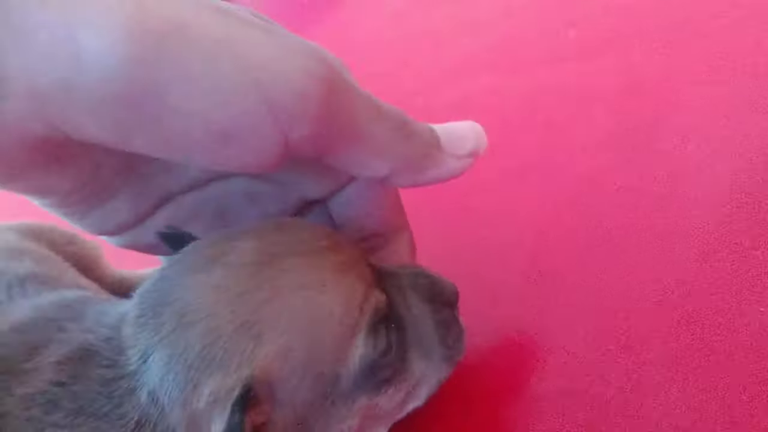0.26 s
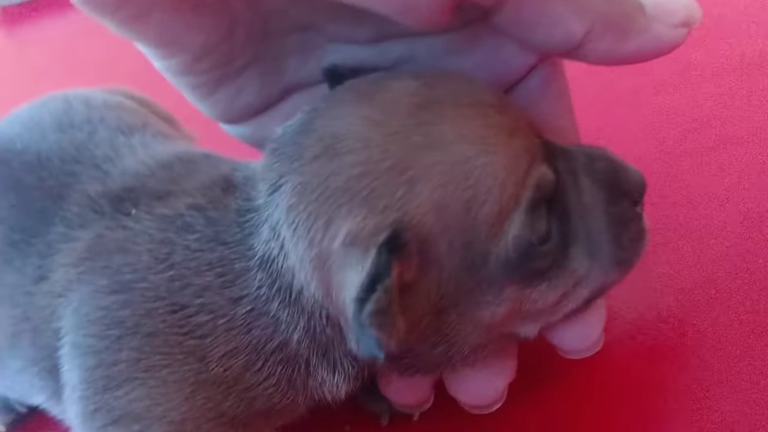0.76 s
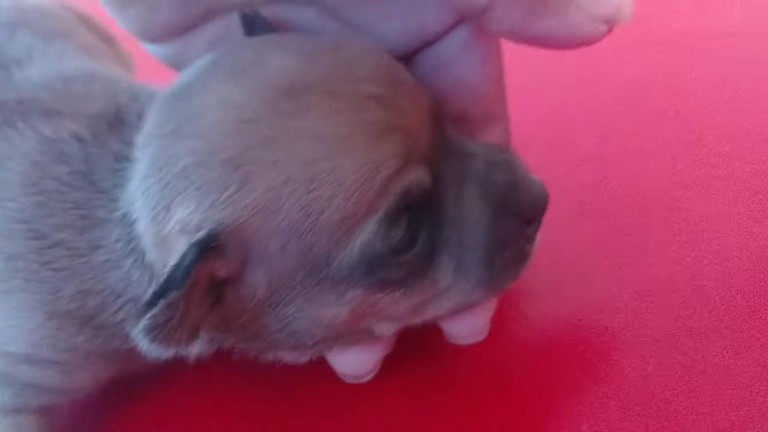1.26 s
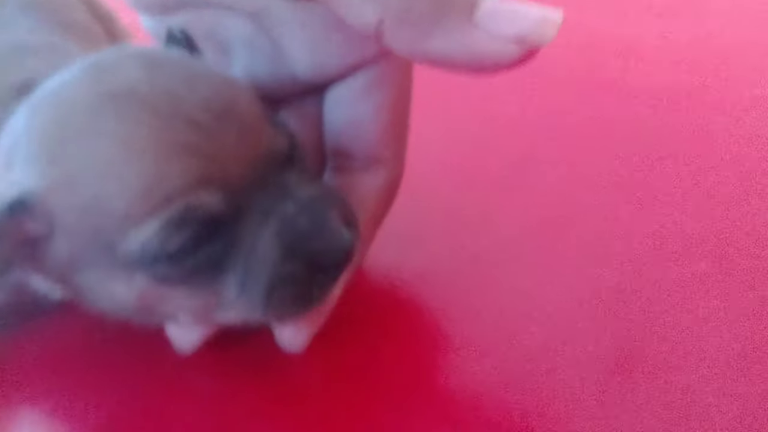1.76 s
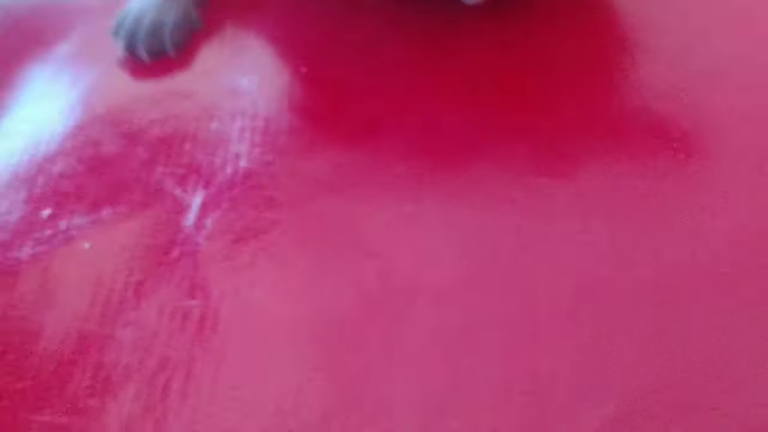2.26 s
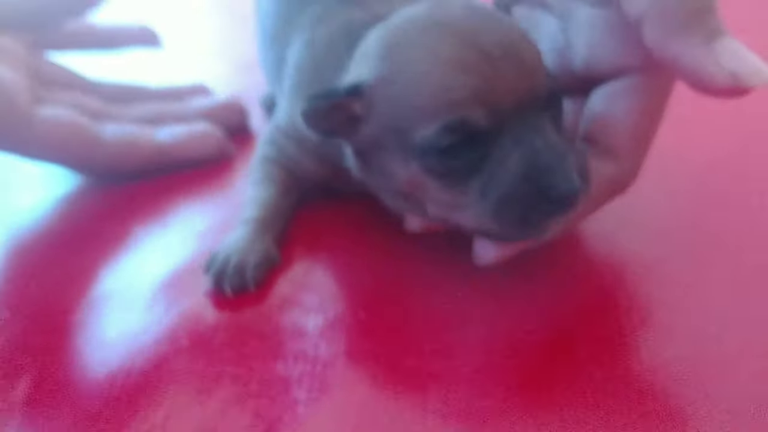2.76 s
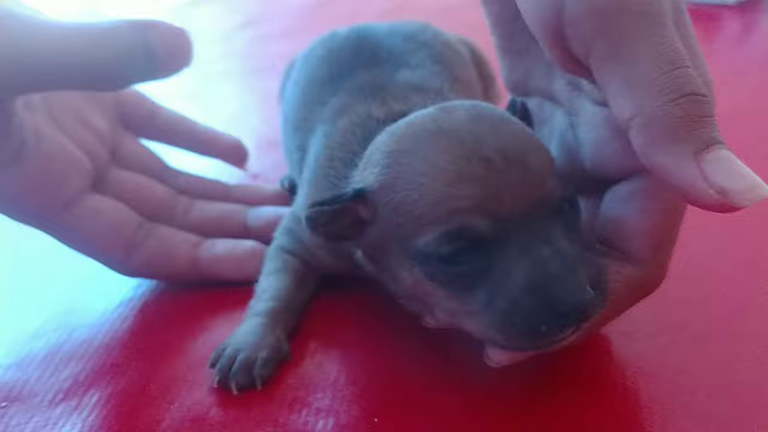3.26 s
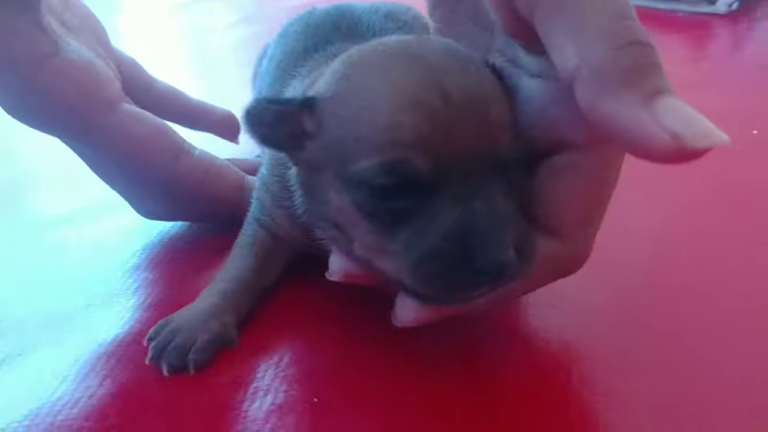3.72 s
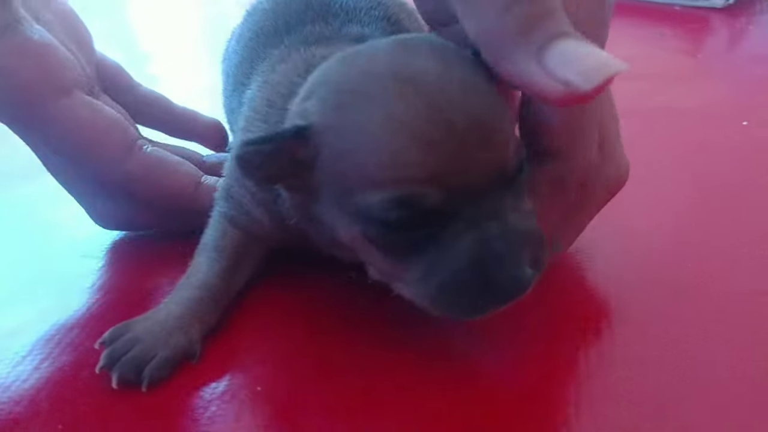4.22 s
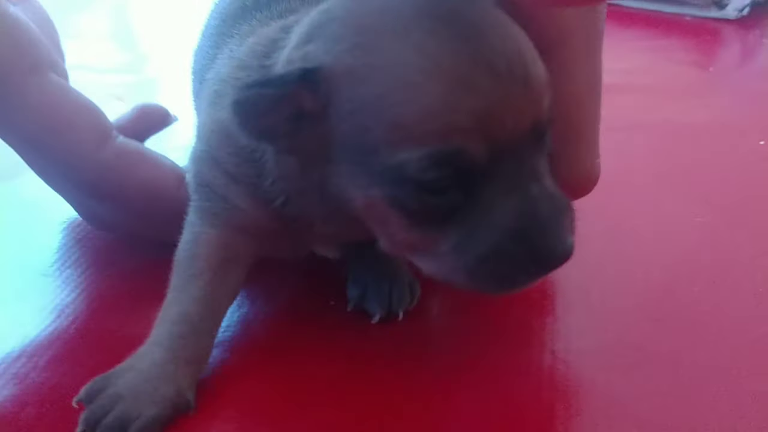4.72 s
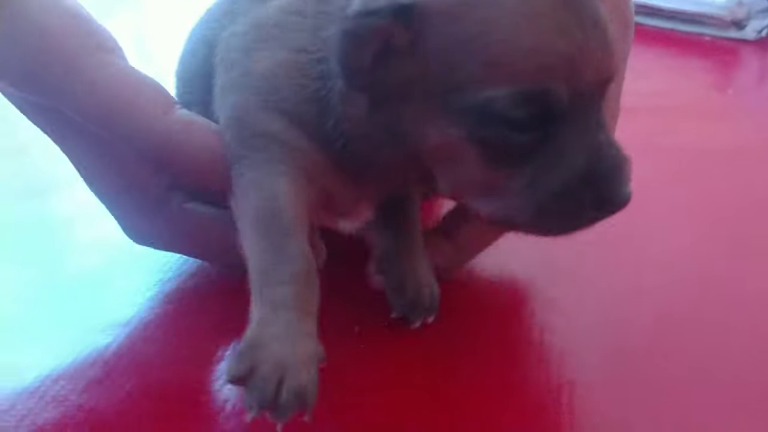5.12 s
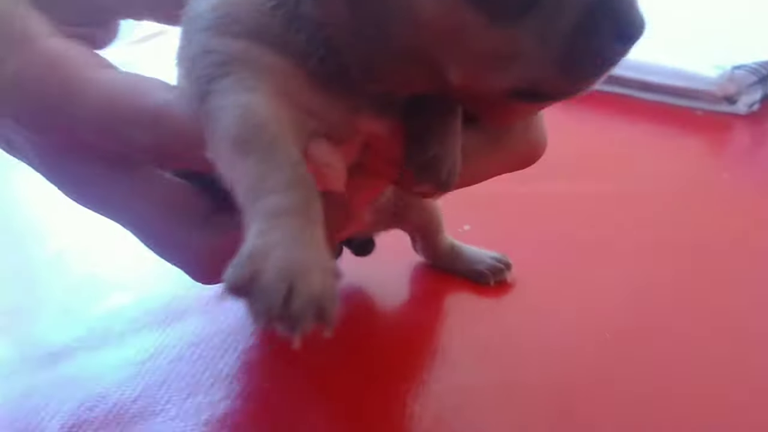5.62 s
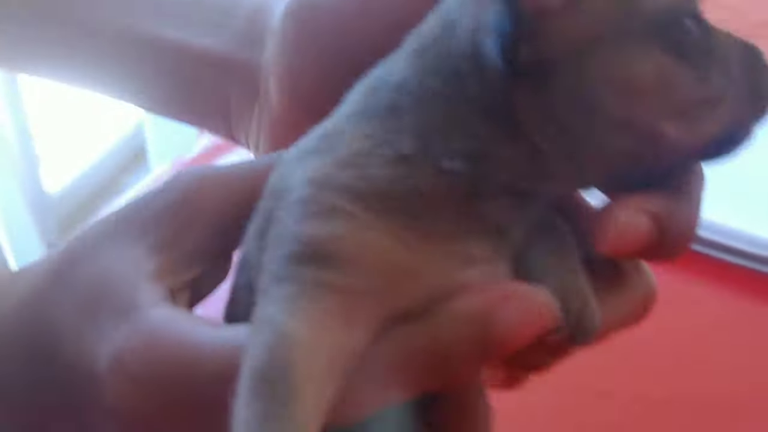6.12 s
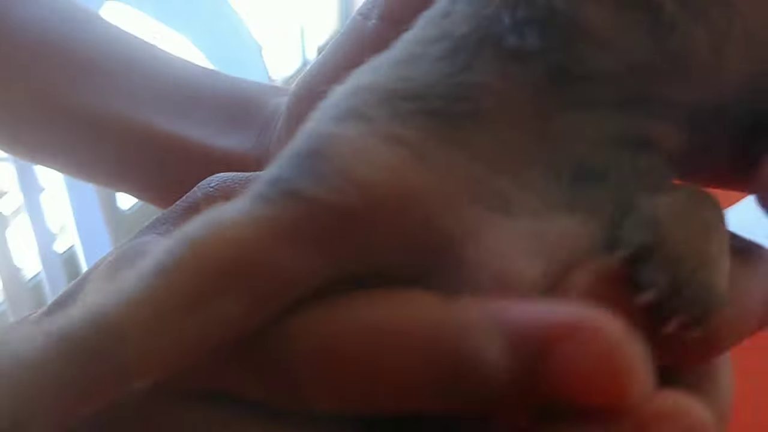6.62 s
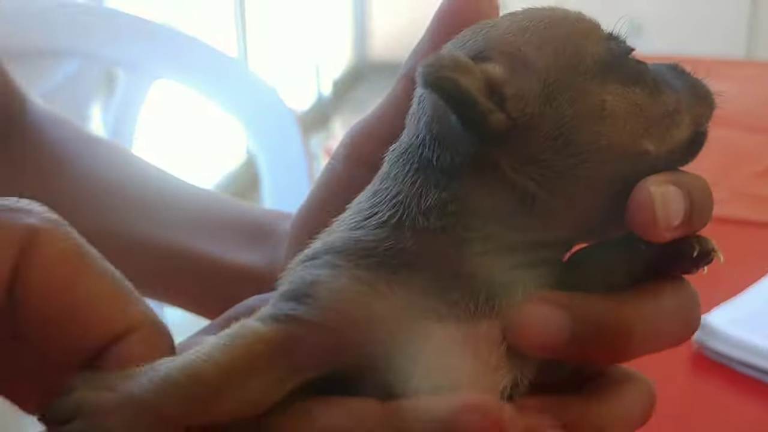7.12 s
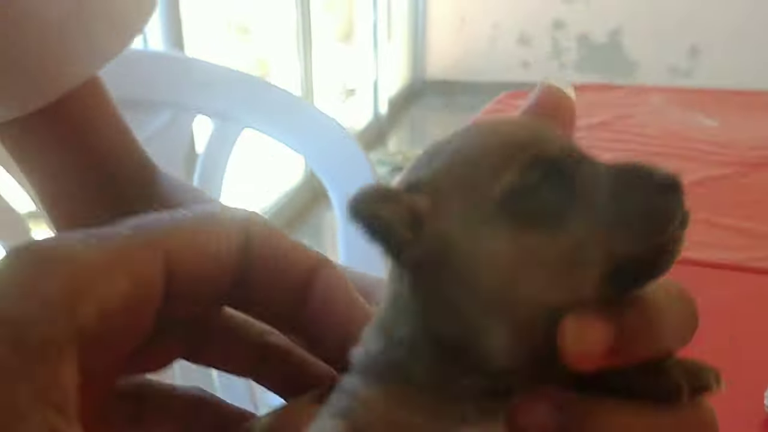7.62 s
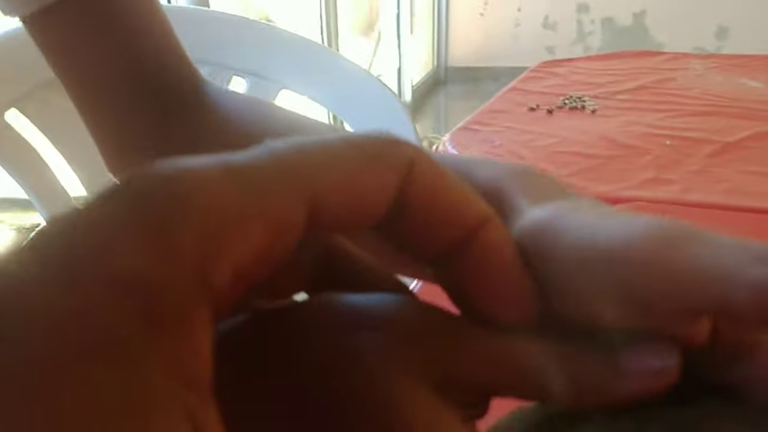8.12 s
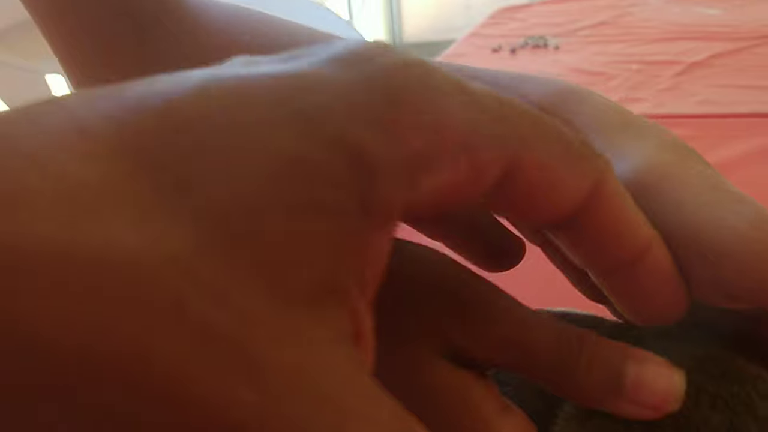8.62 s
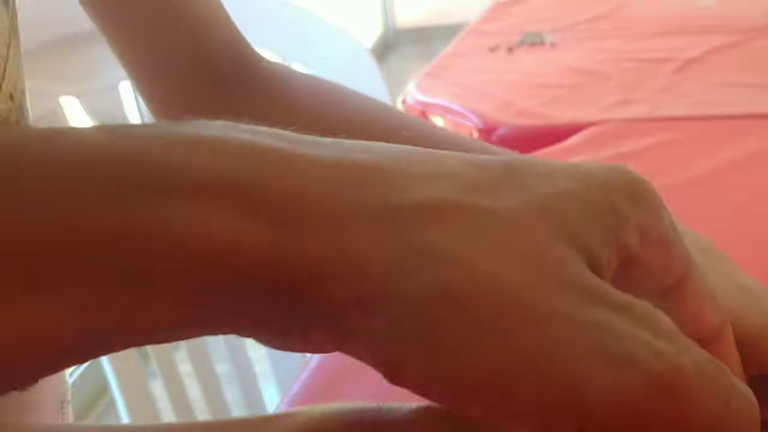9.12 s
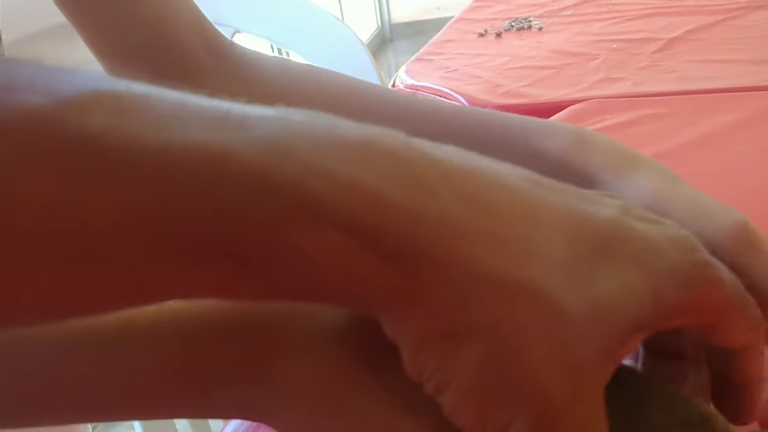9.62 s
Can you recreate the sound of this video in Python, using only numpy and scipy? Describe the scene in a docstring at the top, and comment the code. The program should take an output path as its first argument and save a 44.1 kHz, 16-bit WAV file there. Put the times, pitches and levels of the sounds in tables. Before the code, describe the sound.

A very young puppy cries right beside a small microphone in a nearly dry indoor space. Loud, high wails open, one cracking and fluttering, then lower rising whines. The sound cuts out for a quarter second. Short, soft, arched whimpers follow at about three a second, before louder, longer wails return near the end. A distant machine rumbles and hums faintly underneath.

```python
"""A newborn puppy cries close to a small microphone: short arched whimpers and longer wails that crack and flutter.
Each cry is a stack of overtones coloured by throat and muzzle, with rasp, and air hissing through the nose.
The table top and walls answer faintly; a distant machine rumbles and hums indoors under microphone hiss.
Once the sound drops out for a quarter of a second."""
import sys
import numpy as np
from scipy import signal
from scipy.fft import rfft, irfft, next_fast_len
from scipy.io import wavfile
from scipy.ndimage import uniform_filter1d, map_coordinates

SR = 44100
rng = np.random.default_rng(int(sys.argv[2]) if len(sys.argv) > 2 else 0)


def field_ratio(decibels):
    """Amplitude ratio for a level in dB (20 dB per decade); scalars and array-likes work."""
    return 10 ** (np.asarray(decibels, dtype=float) / 20)


def wav_out(sig):
    """Save sig, one row per channel (or a flat mono array), as 16-bit PCM at SR to the path in sys.argv[1]."""
    wavfile.write(sys.argv[1], SR, np.round(np.clip(np.atleast_2d(sig).T, -1, 1) * 32767).astype(np.int16))


N = 435266

# how well a pitch comes out of the puppy: [f/Hz, level/dB]
CARRY = [(1070, 6), (1200, -1), (1340, -10.5), (1480, -6), (1650, -5.5), (1800, 2.5)]
STALL_DB = -5.5  # the voice thins in a leap between registers


def puppy():
    """The folds give a clean stack of overtones coloured by the throat; rasp and hiss ride along."""
    # wails, yelps and three irregular whimpers, a list of rows for each, before flutter and cracks:
    # [t/s, f/Hz, level/dB]
    cries = [
        [(0.0, 1457, -16.5), (0.032, 1505, -16), (0.056, 1446, -14), (0.21, 1443, -16), (0.224, 1463, -17.5)],
        [(0.387, 1183, -20), (0.399, 1269, -10), (0.406, 1218, -12.5), (0.409, 1128, -11.5), (0.422, 1232, -7),
         (0.428, 1347, -9.5), (0.44, 1508, -14.5), (0.479, 1617, -19.5), (0.489, 1703, -12.5),
         (0.499, 1653, -22), (0.505, 1514, -13), (0.535, 1566, -20.5), (0.563, 1455, -9.5),
         (0.585, 1546, -13.5), (0.765, 1571, -17), (0.89, 1536, -15), (0.901, 1505, -12.5), (0.981, 1466, -18),
         (1.0, 1544, -21), (1.013, 1683, -19)],
        [(1.194, 658.6, -32.5), (1.222, 747, -28.5), (1.238, 844, -19.5), (1.254, 1133, -20.5),
         (1.296, 1249, -22), (1.338, 1205, -29.5), (1.366, 1269, -18), (1.406, 1162, -24), (1.438, 1128, -20.5),
         (1.458, 1006, -19), (1.478, 820, -32.5), (1.492, 755, -33), (1.548, 677, -39)],
        [(1.73, 556.3, -31), (1.744, 556, -26), (1.782, 710, -33.5), (1.814, 840.7, -27.5), (1.858, 972, -17)],
        [(2.118, 1043, -16.5), (2.162, 1117, -32.5)],
        [(2.313, 533.7, -24), (2.327, 550, -20), (2.348, 621.6, -22), (2.375, 755, -22), (2.401, 876, -25),
         (2.421, 1079, -11.5), (2.451, 1105, -14), (2.483, 1135, -20.5), (2.529, 1067, -19), (2.673, 984, -24),
         (2.727, 1006, -26.5)],
        [(2.902, 477, -33.5), (2.92, 486, -33.5), (2.936, 509, -25), (2.994, 653, -32.5), (3.008, 738, -29.5),
         (3.02, 745, -42)],
        [(3.926, 1146, -40), (3.934, 1150, -36.5), (3.946, 1158, -20), (3.949, 1192, -43), (3.953, 1588, -27.5),
         (3.98, 1727, -35.5), (4.118, 1853, -40), (4.152, 1805, -33.5)],
        [(5.071, 1162, -27.5), (5.077, 1174, -26.5), (5.093, 1190, -23.5), (5.101, 1076, -16),
         (5.131, 1179, -18.5), (5.155, 1249, -21.5), (5.161, 1348, -43.5), (5.165, 1514, -29.5),
         (5.195, 1430, -36.5), (5.205, 1025, -19.5), (5.209, 994, -36)],
        [(7.917, 1207, -41), (7.933, 1113, -15.5), (7.945, 1334, -36), (7.948, 1400, -19.5), (7.952, 1840, -32),
         (7.956, 1890, -18.5), (8.001, 1999, -21), (8.067, 1845, -25), (8.099, 1666, -31.5),
         (8.111, 1440, -41.5), (8.119, 976.7, -34)],
        [(8.291, 882.5, -24), (8.311, 868, -26.5), (8.321, 911.5, -16), (8.329, 1077, -14.5),
         (8.349, 1371, -24.5), (8.379, 1454, -19), (8.439, 1514, -25.5), (8.443, 1715, -29), (8.457, 1701, -22),
         (8.467, 1611, -29), (8.505, 1420, -25), (8.511, 1290, -27.5), (8.537, 1308, -26), (8.555, 1217, -27),
         (8.577, 1215, -24), (8.583, 1224, -58), (8.589, 1090, -22.5)],
        [(8.755, 636, -27.5), (8.785, 729, -23), (8.801, 819, -24.5), (8.815, 976, -16.5), (8.827, 1092, -13),
         (8.865, 1170, -22.5), (8.943, 1171, -28.5), (9.0, 1081, -14), (9.043, 1053, -15), (9.07, 923, -17.5),
         (9.125, 967, -21), (9.141, 1064, -19), (9.169, 1115, -29.5)],
        [(9.323, 735, -30.5), (9.347, 739, -28.5), (9.377, 842, -23.5), (9.397, 1020, -16),
         (9.463, 1014, -16.5), (9.523, 1068, -16.5), (9.575, 1156, -19.5), (9.6, 1196, -18.5),
         (9.65, 1289, -21), (9.723, 1345, -23), (9.751, 1434, -23.5)],
    ]
    # one row for each of those: [overtone slope/dB per octave, rasp against voice/dB,
    # rasp gained under strain/dB, hiss level at the start/dB, hiss level at the end/dB];
    # rasp and hiss before the airflow
    cry_voices = [(-11.5, -37, 5.5, -47.5, -56.5), (-13.5, -31.5, 18.5, -53, -43),
                  (-11, -43.5, 33.5, -38.5, -43.5), (-25, -41, 6, -52, -41.5),
                  (-9.5, -29.5, 7.5, -61, -57.5), (-13, -49, 25, -43, -68), (-18, -42, -1, -52, -44.5),
                  (-12, -41, 12, -50, -52.5), (-11.5, -60, 2, -52.5, -58.5), (-13, -41, 29.5, -46.5, -51),
                  (-10.5, -32.5, -2, -35.5, -50), (-11.5, -51.5, 31.5, -42.5, -54),
                  (-13.5, -44, 26.5, -49.5, -55.5)]
    # short arched whimpers: [start t/s, length/s, time in the low register/s, top f/Hz, level/dB]
    whimpers = [(3.203, .118, .055, 1350, -30.5), (3.54, .195, .001, 1635, -32),
                (4.342, .228, .018, 1810, -25.5), (4.737, .167, .012, 1744, -27),
                (5.377, .13, .054, 1462, -22.5), (5.711, .132, .052, 1354, -23),
                (6.053, .115, .004, 1476, -28.5), (6.398, .13, .022, 1379, -28.5),
                (6.753, .13, .03, 1306, -27), (7.103, .212, .007, 1665, -29),
                (7.508, .232, .01, 1822, -27.5)]
    # the same five columns as a cry voice, shared by the arched whimpers above
    whimper_voice = (-14, -65.5, 41, -59.5, -57.5)
    strain_per_s = 5.37  # rise of log pitch at which a voice forced upward is fully strained
    voice, sounding, turns, rasp_db, hiss_db = np.zeros((5, N))
    bend, change_db, flips = cracks()
    calls = list(zip(cries, cry_voices))
    calls += [(whimper(*row), whimper_voice) for row in whimpers]
    for rows, (slope_db, under_db, harsh_db, *air_db) in sorted(calls, key=lambda call: call[0][0][0]):
        (start, first_hz, first_db), (end, last_hz, last_db) = rows[0], rows[-1]
        dying_hz = min(1150, .95 * last_hz)  # the voice sags towards the throat's own note as it dies
        rows = [(start - .006, first_hz, first_db - 35), *rows, (end + 0.013, dying_hz, last_db - 25)]
        s, hz, db = np.transpose(rows)
        span = slice(max(round(s[0] * SR), 0), round(s[-1] * SR))
        t = np.arange(N)[span] / SR
        hz, db = np.interp(t, s, hz), np.interp(t, s, db)
        climb_per_s = uniform_filter1d(np.gradient(np.log(hz), t), size=900)
        strain = np.clip(climb_per_s / strain_per_s, 0, 1)

        hz, db, up = register_flips(t, hz, db)
        strain = np.maximum(strain, up)
        flips[span] = np.maximum(flips[span], 0.42 * up)

        pitch_hz = uniform_filter1d(hz, size=60) * uniform_filter1d(bend[span], size=30)
        pitch_hz = pitch_hz * (1 + .005 * wobble(40, len(t)) + .002 * wobble(400, len(t)))  # quaver and jitter
        phase = 2 * np.pi * np.cumsum(pitch_hz) / SR
        unsteady = np.maximum(flips[span] + (t > end), leaping(hz, t))
        # the bent pitch comes out stronger or weaker
        cracked_db = along(CARRY, hz * bend[span]) - along(CARRY, hz)
        level_db = db + uniform_filter1d(cracked_db + change_db[span], size=90) + .8 * wobble(60, len(t))
        voice[span] = field_ratio(level_db) * overtones(phase, pitch_hz, slope_db, strain, unsteady, up)

        turns[span] = phase
        sounding[span] = 1
        rasp_db[span.start:] = -90  # no rasp once the voice ends
        strain_db = harsh_db * uniform_filter1d(strain, size=1800)
        rasp_db[span] = uniform_filter1d(db, size=1500) + under_db + strain_db
        hiss_db[max(span.start - 500, 0):] = air_db[1]
        hiss_db[span] = np.interp(t, [start, end], air_db)
    return voice + breath(sounding, turns, flips, rasp_db, hiss_db)


def overtones(phase, pitch_hz, slope_db, strain, unsteady, up):
    """Eighteen sines tilted by the folds and the throat, brought to rms 1; strain brightens them."""
    # gain of throat and muzzle: [f/Hz, level/dB]
    throat = [(450, -10), (800, -3), (1100, 18), (1500, 5.5), (2000, 5), (2400, 9.5), (2900, -4.5),
              (3500, -6), (4100, -14), (4700, -7), (5600, -11.5), (6500, -6), (7500, 4.5), (9000, 0.5),
              (10200, -1.5), (11500, 3), (13000, 3.5), (15000, 2)]
    order = np.arange(1, 19)[:, None]
    octaves = np.log2(order)
    # higher overtones come and go more
    drift_db = 2.0 * octaves * np.array([wobble(30, len(phase)) for _ in order])
    # a flipped, leaping or dying voice loses its upper overtones
    thinned_db = -14 * ((order > 2) * unsteady + (order == 2) * up)
    tilt_db = (slope_db + 4.5 * strain) * octaves
    # strain gives the second overtone an extra lift; the folds favour it over the third
    tilt_db = tilt_db + 5 * strain * (order == 2) - 2 * (order == 3)
    gains = field_ratio(tilt_db + along(throat, order * pitch_hz) + drift_db + thinned_db)
    gains = gains * (order * pitch_hz < 14900)
    gains = gains / np.sqrt(np.sum(gains ** 2, axis=0) / 2)
    return np.sum(gains * np.sin(order * phase), axis=0)


def whimper(start, length, low, top_hz, db):
    """Rows (s, Hz, dB) of one arch: climb in the low register, leap, hold, sag, drop."""
    rise_s, quickest_s, haste = .022, .003, .33  # the longer the low register held, the quicker the leap
    sag, sag_s, fall_s, rest_hz = 0.078, .018, .014, 1070  # top sags, then drops to the throat's own note
    leave_hz, climb_hz_per_s = 1249.4, 2900  # the low register climbs until it gives way here
    brief_s, rounder = 0.075, 1.4  # whimpers longer than this hold a flatter top
    drop_db_per_khz, swell_db_per_s = -36, 7  # a long drop spends the breath; a held top grows
    onset_db, onset_s = -7, .004  # a whimper starts soft
    since = np.arange(0, length, .002)
    rise = max(quickest_s, rise_s - haste * low)
    left = length - fall_s - since
    sagging = sag * np.exp(-np.maximum(left, 0) / sag_s * (length / brief_s) ** rounder)
    unreached = np.exp(-(np.maximum(since - low, 0) / rise) ** 1.4)
    held = top_hz * (1 - sagging) - (top_hz - leave_hz) * unreached
    dropped = np.clip(-left / (fall_s - .004), 0, 1)
    hz = held - climb_hz_per_s * np.maximum(low - since, 0) + dropped * (rest_hz - held)
    hz = hz * (1 + .007 * wobble(35, SR)[np.round(since * SR).astype(int)])  # quaver
    spent_db = drop_db_per_khz * dropped * (top_hz - leave_hz) / 1000
    spent_db = spent_db + swell_db_per_s * since + onset_db * np.exp(-since / onset_s)
    level_db = db + along(CARRY, hz) + STALL_DB * leaping(hz, since) + spent_db
    return list(zip(start + since, hz, level_db))


def leaping(hz, t):
    """0 to 1: how fast the pitch leaps between registers."""
    return np.minimum(np.abs(np.gradient(np.log(hz), t)) / 25, 1)


def register_flips(t, hz, db):
    """The low register gives way for a moment: pitch (Hz), level (dB) and how far the voice has flipped."""
    # the moments: [from t/s, to t/s, f/Hz, level/dB]
    moments = [(2.429, 2.439, 1440, -16.5), (2.456, 2.478, 1440, -22.5)]
    flipped = np.zeros(len(t))
    for begin, stop, high_hz, high_db in moments:
        up = uniform_filter1d(1. * ((t > begin) & (t < stop)), size=170)
        hz = hz + up * (high_hz - hz)
        db = db + up * (high_db - db) + 4 * STALL_DB * up * (1 - up)  # thins most halfway through the leap
        flipped += up
    return hz, db, flipped


def cracks():
    """Pitch flips up and the folds catch again: pitch ratio, level change (dB) and share of time flipped."""
    # voice cracks: [t/s, length/ms, swell level/dB]
    crack_rows = [(.446, 2, 4.5), (.61, 3, -4.5), (.623, 2.6, 2.5), (.636, 2.1, 3.5), (.649, 3.8, 3),
                  (.662, 3, 2), (.676, 2.9, 3.5), (.691, 6.2, 0), (.714, 3.9, 2.5), (.737, 7, 1.5),
                  (.785, 4, 2.5), (.811, 6.7, -1), (.839, 8, -1), (.866, 3.7, -1), (.887, 6, -1),
                  (9.36, 2, 4), (9.578, 3.8, 5), (9.601, 4, -11), (9.614, 2.3, -3.5), (9.629, 3, 3),
                  (9.645, 2.4, 6.5), (9.66, 3, -1.5), (9.682, 3, -1)]
    t, bend, change_db, flips = np.arange(N) / SR, np.ones(N), np.zeros(N), np.zeros(N)
    for s, ms, swell_db in crack_rows:
        near = slice(round((s - .01) * SR), round((s + .05) * SR))
        since, end = t[near] - s, ms / 1000
        flipped = (np.tanh(since / .0006) - np.tanh((since - end) / .0004)) / 2
        after = np.clip(since - end, 0, None)
        restart = (since > end) * np.exp(-after / 0.0062)  # restarts low, climbs back
        bend[near] *= 1 + 0.13 * flipped - .09 * restart
        stall = np.exp(-((since - end) / .001 - 1) ** 2)  # the folds stall
        change_db[near] += swell_db * flipped - rng.uniform(2, 14) * stall
        flips[near] += flipped
    return bend, change_db, flips


def breath(sounding, turns, flips, rasp_db, hiss_db):
    """Air puffs through the folds once a cycle: rasp rings in the mouth, hiss leaves by the nose."""
    # nose hiss, relative: [f/Hz, level/dB per Hz]
    nose = [(3000, -27.5), (5500, -17), (7500, 0), (9500, -2.5), (13000, 2.5), (15000, -13), (16200, -42.5)]
    lingering = signal.lfilter([.0008], [1, .0008 - 1], sounding)  # the breath runs out after the voice
    flow = np.maximum(uniform_filter1d(sounding, size=900) ** 2, 0.39 * lingering)
    opening = sounding * np.exp(30 * (np.cos(turns) - 1))  # one short puff a cycle
    # uneven cycles tear side lines off each overtone
    torn = opening * wobble(350, N) + .12 * rng.standard_normal(N)
    bursts = field_ratio(19 * uniform_filter1d(flips, size=260, origin=100))  # rasp bursts out of the cracks
    rasp = coloured(torn, lambda hz: mouth_ring(hz) ** 2) * bursts
    puffs = opening * wobble(830, N)  # uneven puffs gather the hiss around the overtones
    hiss = (coloured(puffs, lambda hz: field_ratio(along(nose, hz))) + noise(nose)) / 2
    return flow * (field_ratio(rasp_db) * rasp + field_ratio(hiss_db) * hiss)


def mouth_ring(hz):
    """Complex gain of the air ringing in the mouth, resonances summed with alternating sign."""
    # rings, relative and before squaring: [f/Hz, width/Hz, level/dB]
    rings = [(2400, 1700, 2.5), (3775, 970, 3.5), (4710, 310, -2.5)]
    total = 0
    for k, (centre, width, db) in enumerate(rings):
        damping = 1j * hz * width
        total = total + (-1) ** k * field_ratio(db) * damping / (centre * centre - hz * hz + damping)
    return total


def muzzle(x):
    """Each mouth resonance is lifted or lowered as the puppy moves jaw and head."""
    # resonances: [f/Hz, half width/Hz]
    mouth_bands = [(2400, 440), (4650, 720), (12500, 3200)]
    # gain of each of those resonances in turn: [t/s, level/dB, level/dB, level/dB]
    moves = [(0, 4.5, -1, -8.5), (.75, 0.5, 17, -4), (1.35, 12, 7.5, -9.5), (2.4, 3, 2.5, -3),
             (4.5, 3, 3, 3), (5.699, -6, -1, 0.5), (6.3, 6, -2, 0.5), (7.3, 6.5, 9, 12.5),
             (8.3, 2.5, 0, -5.5), (8.8, 6, -0.5, -7), (9.7, -4, -3.5, -5)]
    m = next_fast_len(N)
    hz, spectrum = np.fft.rfftfreq(m, 1 / SR), rfft(x, m)
    s, *gains_db = np.transpose(moves)
    out = x
    for (centre, width), db in zip(mouth_bands, gains_db):
        band = irfft(spectrum * np.exp(-((hz - centre) / width) ** 4), m)[:N]
        out = out + (field_ratio(np.interp(np.arange(N) / SR, s, db)) - 1) * band
    return out


def room(x):
    """A short, faint answer of the table top and walls: noise that dies 60 dB in 50 ms."""
    t = np.arange(SR // 8) / SR
    tail = field_ratio(-60 * t / .05) * uniform_filter1d(rng.standard_normal(len(t)), size=4)
    return signal.fftconvolve(x, tail / np.linalg.norm(tail))[:N]


def machine_hum():
    """Steady tones of the distant machine, each wavering in level and phase."""
    # tones before they waver, at the median background level: [f/Hz, level/dB rms]
    tones = [(50, -55), (101, -53), (171, -50.5)]
    t, total = np.arange(N) / SR, np.zeros(N)
    for hz, db in tones:
        level = field_ratio(db + 2.0 * wobble(4.9, N)) * np.sqrt(2)
        total += level * np.sin(2 * np.pi * hz * t + wobble(2.2, N))
    return total


def microphone_hiss():
    """The microphone's own noise, of rms 1."""
    # relative: [f/Hz, level/dB per Hz]
    hiss_spectrum = [(1500, -7.5), (4000, -4), (9500, -3), (11000, -5), (14500, -2), (16000, -37)]
    return noise(hiss_spectrum)


def indoor_rumble():
    """Low noise of the machine heard indoors, of rms 1."""
    # relative: [f/Hz, level/dB per Hz]
    indoors = [(12, -49.5), (20, -14), (126, -1.5), (193, -13), (297, -23), (652, -29), (1270, -36),
               (1650, -37.5), (3550, -51), (6000, -54.5), (7800, -84.5), (13200, -120)]
    return noise(indoors)


def background():
    """Rumble, machine hum and microphone hiss; all lie lower near the start and the end."""
    # rumble before it wavers: [t/s, level/dB]
    rumble_course = [(.9, -48.5), (2, -43.5), (8.7, -42.5), (9.2, -46)]
    level_db = np.interp(np.arange(N) / SR, *np.transpose(rumble_course))
    steady = machine_hum() + field_ratio(-72.5) * microphone_hiss()
    rumble = field_ratio(level_db + .8 * wobble(2.5, N)) * indoor_rumble()
    return field_ratio(level_db - np.median(level_db)) * steady + rumble


def along(points, hz):
    """Value at hz between (Hz, value) points on a log axis."""
    f, v = np.transpose(points)
    return np.interp(np.log(hz + 1), np.log(f + 1), v)


def wobble(rate, n):
    """A smooth random curve, rate knots a second."""
    return map_coordinates(rng.standard_normal(int(n * rate / SR) + 4), [np.arange(n) * rate / SR])


def coloured(x, gain):
    """x times a gain that depends on frequency, brought to rms 1."""
    m = next_fast_len(N)
    y = irfft(rfft(x, m) * gain(np.fft.rfftfreq(m, 1 / SR)), m)[:N]
    return y / y.std()


def noise(spectrum):
    """Coloured noise of rms 1."""
    return coloured(rng.standard_normal(N), lambda hz: field_ratio(along(spectrum, hz)))


def scene():
    """The puppy up close, its faint room answer 24 dB down, and the background."""
    pup = muzzle(puppy())
    return (pup + field_ratio(-24) * room(pup) + background())[None]


def low_pass(x):
    """Removes everything above the highest recorded frequency."""
    return signal.sosfilt(signal.butter(12, 16490, fs=SR, output="sos"), x)


def record(dry):
    """The sound cuts out abruptly for a quarter of a second."""
    # silence: [from t/s, to t/s]
    dropout = (1.864, 2.1145)
    t = np.arange(N) / SR
    heard = (t < dropout[0]) | (t > dropout[1])
    return low_pass(dry * heard)


dry = scene()
out = record(dry)
wav_out(out)
```